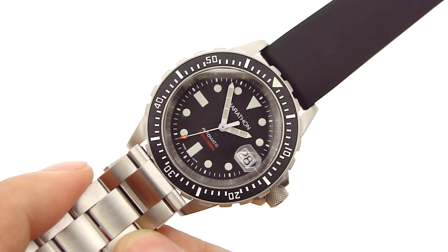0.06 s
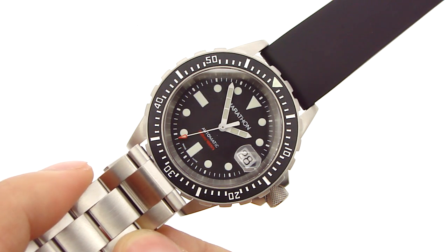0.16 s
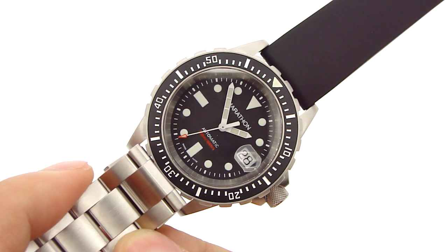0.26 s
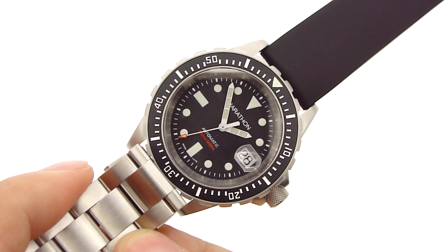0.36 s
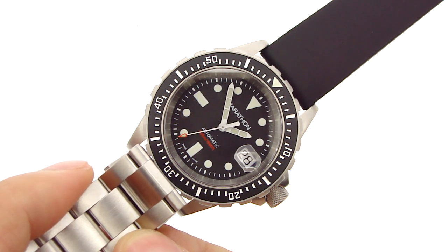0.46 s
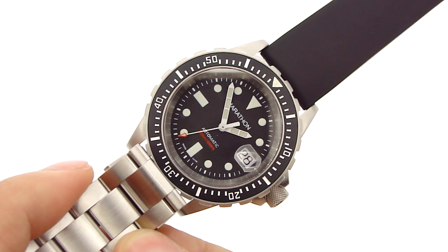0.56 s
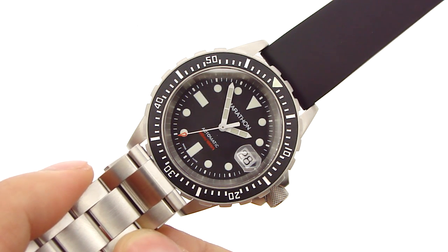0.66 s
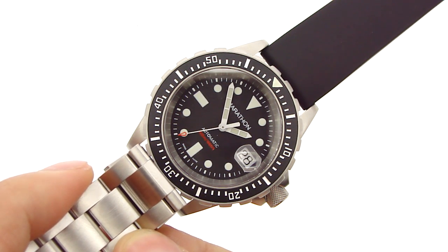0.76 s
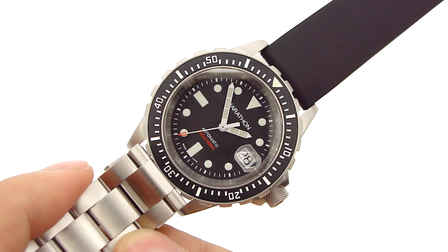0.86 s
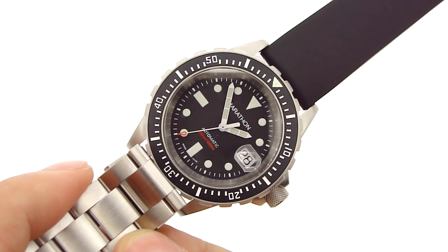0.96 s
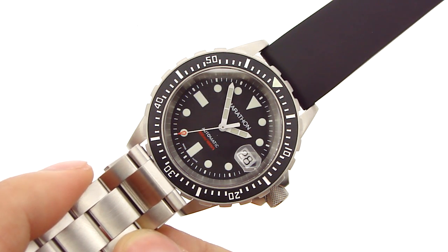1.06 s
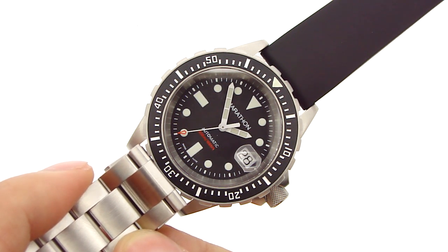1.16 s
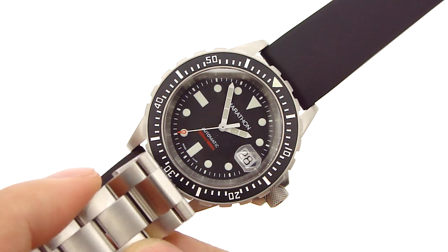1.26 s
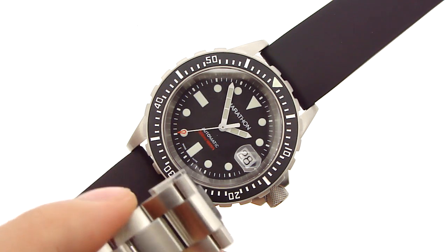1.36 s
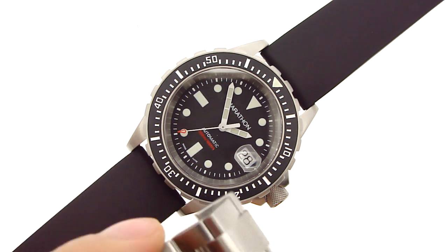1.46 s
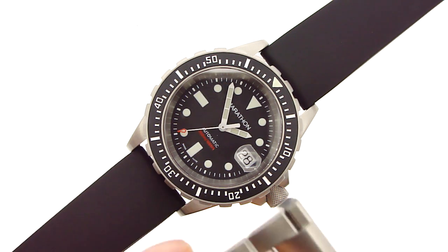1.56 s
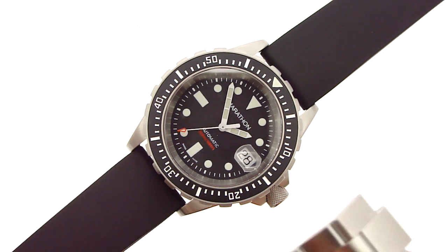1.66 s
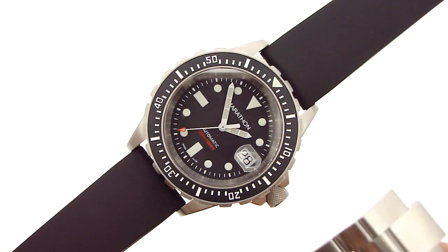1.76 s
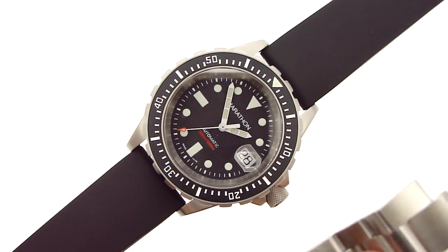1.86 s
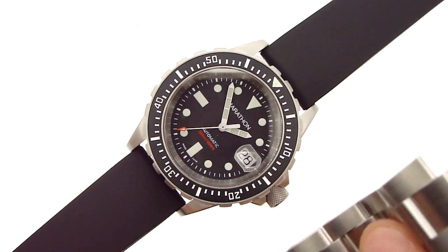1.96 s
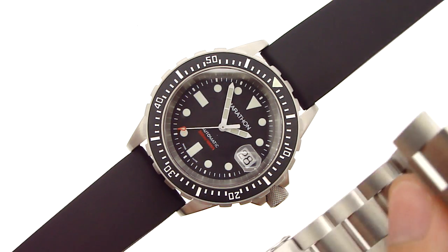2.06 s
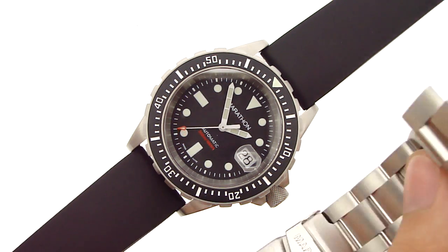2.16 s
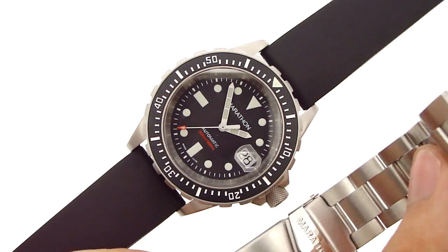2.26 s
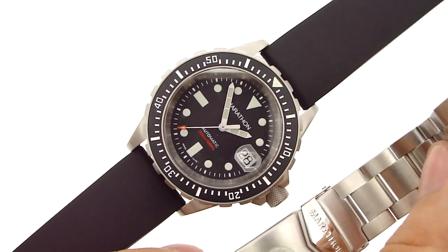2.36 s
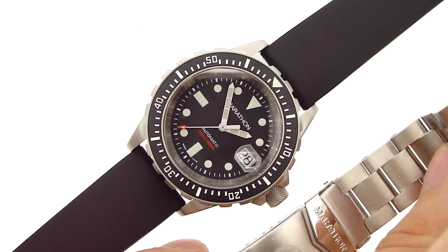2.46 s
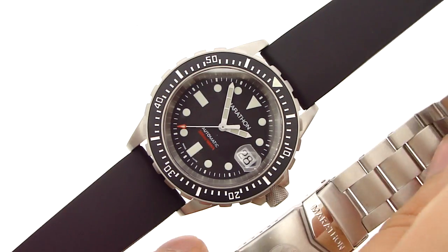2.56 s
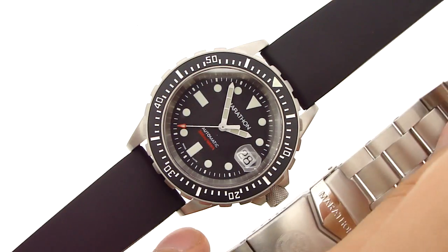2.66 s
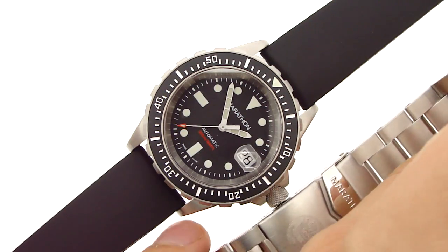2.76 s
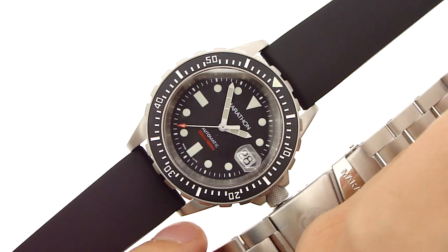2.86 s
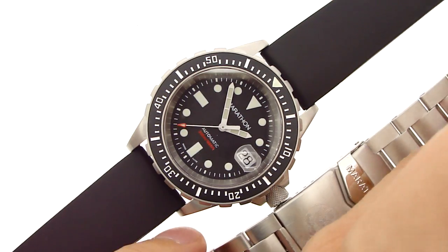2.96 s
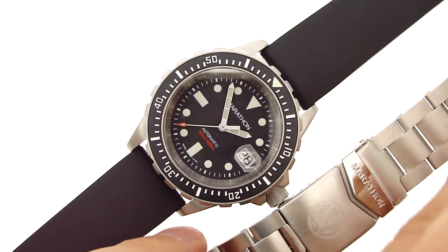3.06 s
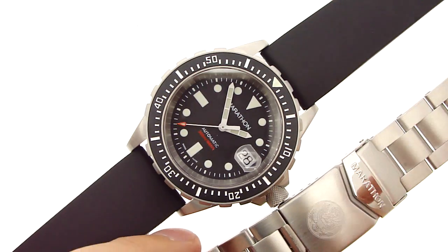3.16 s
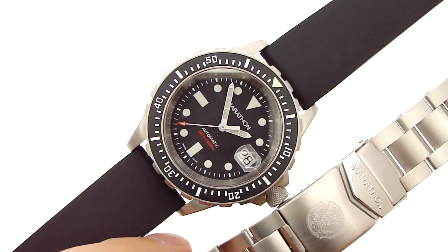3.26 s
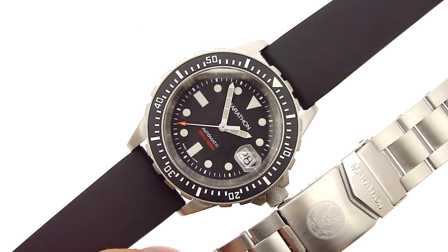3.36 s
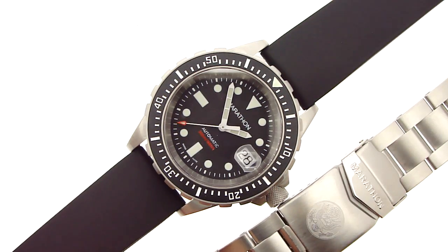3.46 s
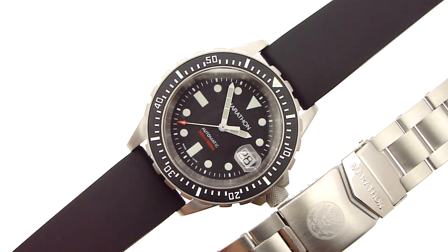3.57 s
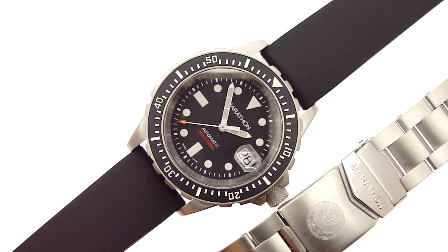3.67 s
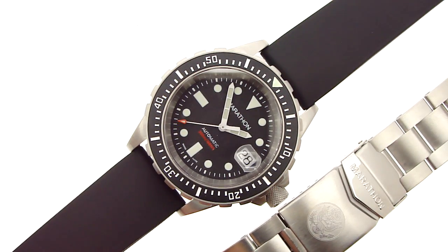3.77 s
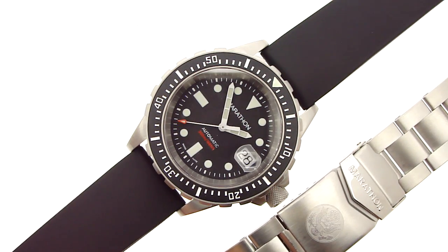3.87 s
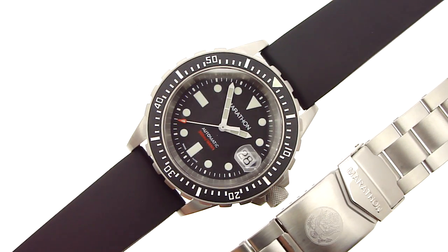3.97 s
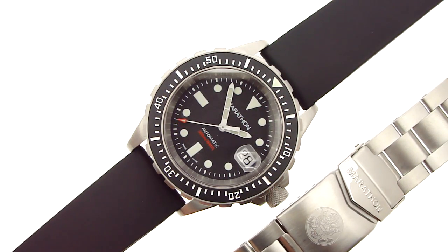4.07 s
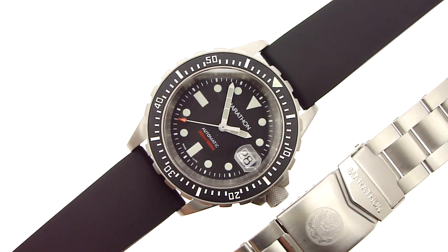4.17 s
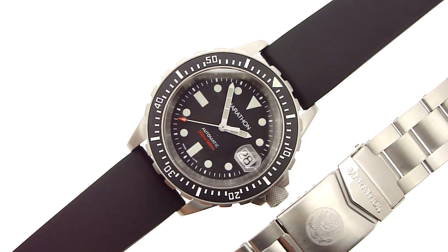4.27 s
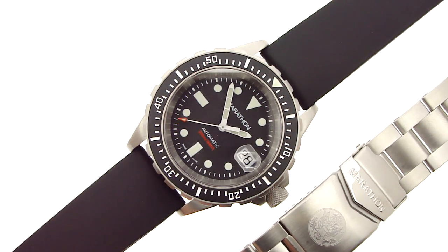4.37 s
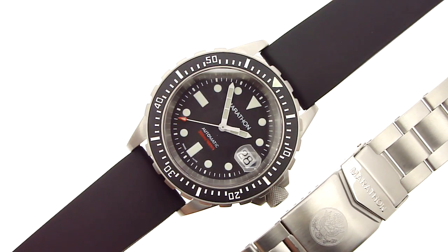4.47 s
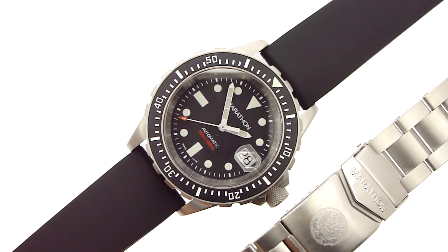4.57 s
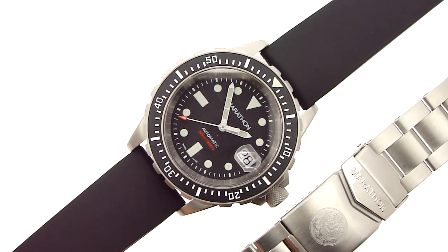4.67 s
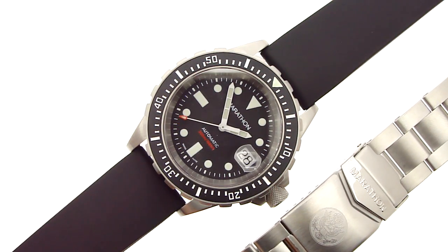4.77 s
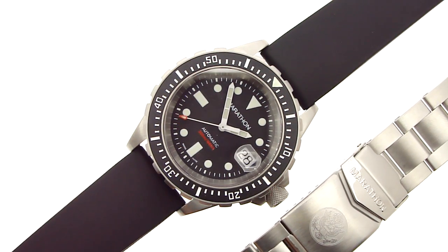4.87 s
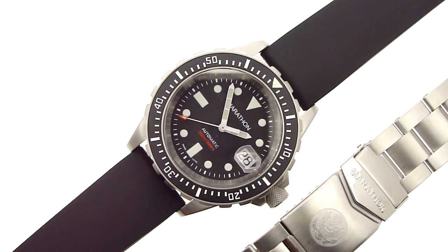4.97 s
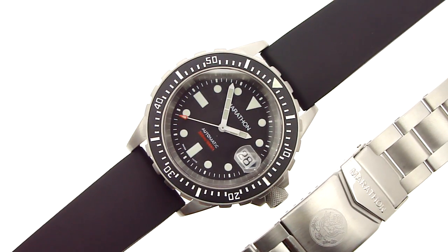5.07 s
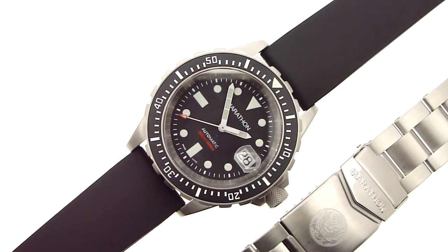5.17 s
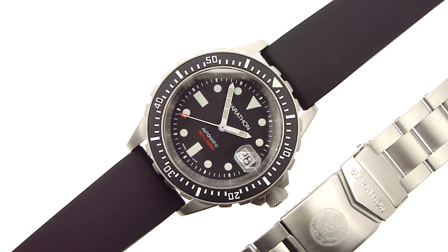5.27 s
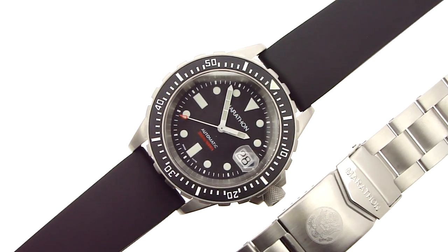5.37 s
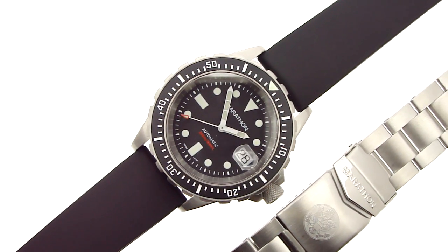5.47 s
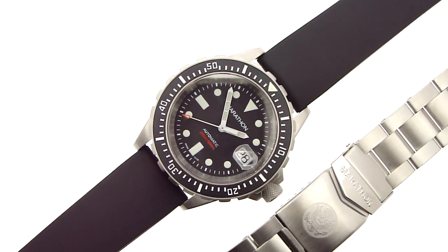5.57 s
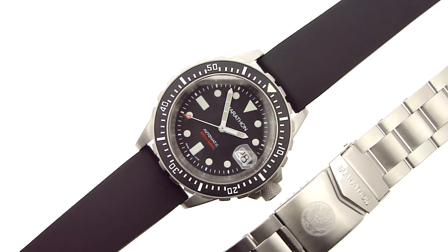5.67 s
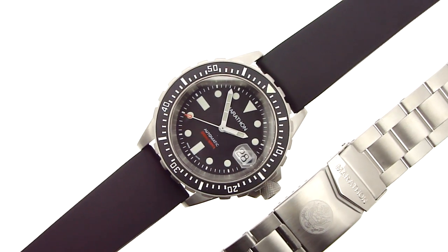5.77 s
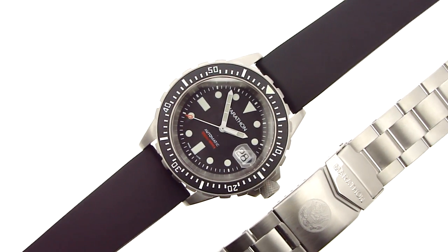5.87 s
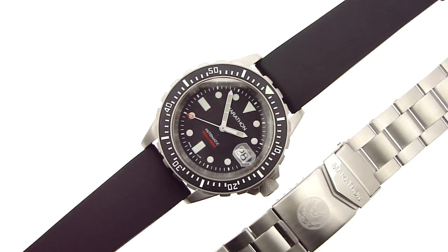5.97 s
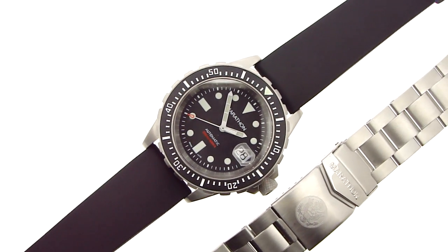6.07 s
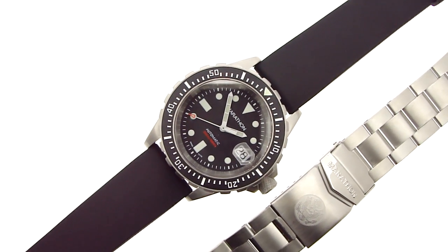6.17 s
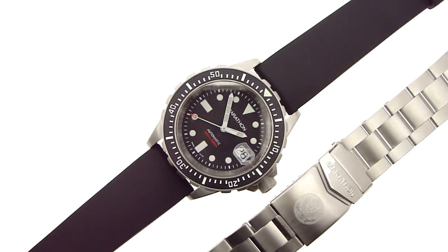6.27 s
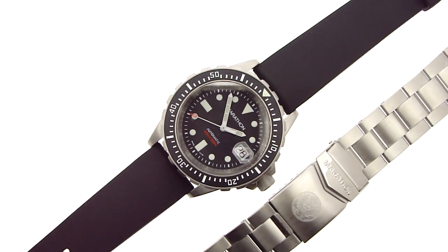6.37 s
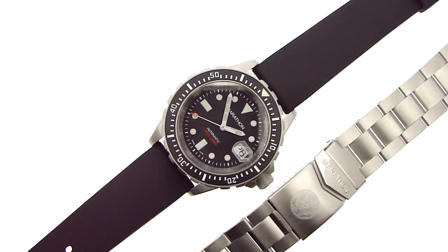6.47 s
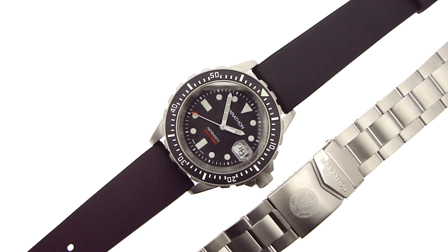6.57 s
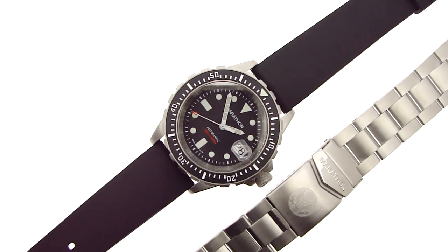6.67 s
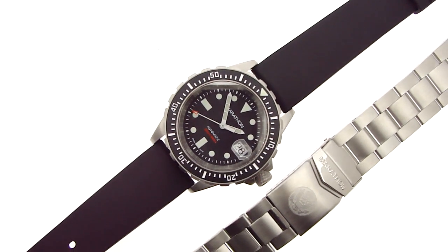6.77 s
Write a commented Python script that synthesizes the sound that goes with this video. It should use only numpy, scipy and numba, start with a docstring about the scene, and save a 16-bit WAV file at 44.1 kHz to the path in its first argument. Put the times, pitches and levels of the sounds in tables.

```python
"""A steel watch bracelet is lifted, laid on a table and nudged into place near a camera's microphone.
Links tick in the air, then links and clasp knock the table, ring and scrape.
The brightest clinks make the gain control duck the room's steady fan and mains hum.
Then a small plastic switch clicks twice under a fingertip and the camera's geared zoom motor whirrs."""
import sys
import numpy as np
from scipy import signal
from scipy.fft import rfft, irfft, next_fast_len
from scipy.io import wavfile
from scipy.ndimage import uniform_filter1d
from numba import njit

SR = 44100
rng = np.random.default_rng(int(sys.argv[2]) if len(sys.argv) > 2 else 0)


def unload_wav(signal):
    """Save mono or channel-first audio to the path in sys.argv[1] as 16-bit WAV at rate SR, clipped to [-1, 1]."""
    wavfile.write(
        sys.argv[1],
        SR,
        np.round(np.clip(np.atleast_2d(signal).T, -1, 1) * 32767).astype(np.int16),
    )


N = 300743
TIME = np.arange(N) / SR
ZOOM_START_S, ZOOM_SETTLE_S = 5.346, 0.086

# resonances shared by all links: freq_hz, width_hz, gain_db
BRACELET_MODES = [(2580, 160, 6), (3100, 200, 1), (3580, 110, 6), (4270, 200, 12), (4610, 200, 13.5),
                  (5350, 90, 12), (7090, 100, 17), (8450, 240, 13), (10420, 1200, 19)]
# resonances of the plastic switch: freq_hz, width_hz, gain_db
PLASTIC_MODES = [(2080, 940, 4), (3120, 900, 15), (4800, 740, -4), (8000, 1500, -3)]


def undb(db):
    return 10 ** (np.asarray(db) / 20)


def unit(x):
    return x / np.sqrt(np.mean(x ** 2))


def colour(x, points):
    """EQ through (freq_hz, gain_db) points."""
    hz, db = np.transpose(points)
    size = next_fast_len(len(x))
    bins_hz = np.maximum(np.fft.rfftfreq(size, 1 / SR), 1)
    gain = undb(np.interp(np.log(bins_hz), np.log(hz), db))
    return irfft(rfft(x, size) * gain, size)[:len(x)]


def resonate(x, modes, weights=1):
    """Input plus the ringing of each (freq_hz, width_hz, gain_db) mode."""
    out = x
    for (hz, width_hz, db), weight in zip(modes, weights * np.ones(len(modes))):
        out = out + weight * undb(db) * signal.lfilter(*signal.iirpeak(hz, hz / width_hz, fs=SR), x)
    return out


def band(x, edges_hz, order=3):
    return signal.sosfilt(signal.butter(order, edges_hz, "bandpass", fs=SR, output="sos"), x)


def hiss(hz, width_hz):
    """Noise band at unit rms."""
    return unit(band(rng.standard_normal(N), (hz - width_hz / 2, hz + width_hz / 2), order=2))


def at_level(x, db):
    """Scale a burst to the energy of 10 ms at db rms."""
    return x * undb(db) / np.sqrt(np.sum(x ** 2) / (SR / 100))


def add(out, start_s, x):
    i = int(start_s * SR)
    out[i:i + len(x)] += x[:N - i]


def drift(rate_hz):
    """Smooth random curve at unit rms."""
    step = int(SR / rate_hz)
    return unit(uniform_filter1d(np.repeat(rng.standard_normal(N // step + 1), step), step)[:N])


def swell(start_s, length_s, attack_s, release_s):
    """Linear rise, hold, exponential release."""
    age_s = TIME - start_s
    return np.clip(age_s / attack_s, 0, 1) * np.exp(-np.maximum(age_s - length_s, 0) / release_s)


def room(air_db=-43, waver_db=1.1, whine_db=-56, whine_drop_db=17):
    """Fan air, wavering mains and fan tones, and a thin whine that softens once the zoom runs."""
    # fan air spectrum: freq_hz, gain_db
    air_spectrum = [(18, -62), (30, -42), (53, -1.5), (91, -7.5), (119, -5.5), (205, -7), (232, -3),
                    (430, -9), (741, -12), (925, -10.5), (1340, -13.5), (1550, -15.5), (1800, -11),
                    (3250, -20.5), (11300, -38), (14200, -120), (22000, -120)]
    # fan air resonances: freq_hz, width_hz, gain_db
    air_modes = [(171.6, 35, 1.5), (292.4, 21, -2), (745, 11.8, 8), (1140, 84, -11), (1347, 100, 2.5),
                 (1760, 210, -15.5), (7020, 116, 1.5), (9650, 840, -3), (10150, 350, -2)]
    # mains and fan tones: pitch_hz, rms_db
    hum_tones = [(58.5, -73), (73.8, -75), (117, -61.5), (131, -56), (233.9, -52.5), (1754.2, -57.5)]
    air = colour(resonate(rng.standard_normal(N), air_modes), air_spectrum)
    low_cut = signal.butter(4, 125, "highpass", fs=SR, output="sos")
    air = unit(signal.sosfilt(low_cut, air) + 0.16 * air)
    hum = np.zeros(N)
    for hz, db in hum_tones:
        peak = np.sqrt(2) * undb(db + waver_db * drift(3.5))
        hum += peak * np.sin(2 * np.pi * (hz * TIME + rng.random()) + 0.55 * drift(4.14))
    zooming = np.clip((TIME - ZOOM_START_S) / ZOOM_SETTLE_S, 0, 1)
    whine = hiss(2095, width_hz=112) * undb(whine_db - whine_drop_db * zooming)
    return air * undb(air_db + 0.2 * drift(5)) + hum + whine


def clink(contact_s, modes, tail_db, crack=4, shared=0.25, early_db=-12, early_s=0.005,
          chatter_db=-24, chatter_s=0.011, room_db=-36, room_s=0.072, size=8192):
    """Steel contact: a crack amid tiny impacts, then reflections, link chatter and faint room decay."""
    t = np.arange(size) / SR
    rattle = unit(undb(2.5 * np.repeat(rng.standard_normal(size // 32), 32)))
    early = undb(early_db) * np.exp(-t / early_s)
    chatter = rattle * undb(chatter_db) * np.exp(-t / chatter_s)
    tail = undb(tail_db) * (early + chatter + undb(room_db) * np.exp(-t / room_s))
    progress = t / contact_s
    pulse = progress ** 2 * np.exp(2 - 2 * progress)
    force = rng.standard_normal(size) * (pulse + tail * (1 - np.exp(-progress)))
    force[np.argmax(progress >= 1)] += crack  # main impact at the pulse peak
    shared_mix = shared * rng.standard_normal(len(BRACELET_MODES))
    return resonate(resonate(force, modes), BRACELET_MODES, shared_mix)


def loose_links(contact_s=0.0008, width_hz=550, ring_db=14):
    """Airborne links tick, short and dry, each at its own pitch, with no knock."""
    # link-on-link ticks: start_s, level_db, ring_hz
    ticks = [(1.389, -57, 9000), (1.504, -46.5, 9300), (1.5095, -51, 10000), (1.602, -50, 6870),
             (1.6225, -58, 7000), (1.639, -48, 6300), (1.717, -51.5, 5030), (1.744, -57, 6800),
             (1.8943, -38.5, 5350), (1.9068, -38.5, 5450), (1.9334, -49.5, 6400), (2.1492, -47.5, 5700),
             (2.181, -53, 6300)]
    out = np.zeros(N)
    for start_s, db, ring_hz in ticks:
        tick = clink(contact_s, [(ring_hz, width_hz, ring_db)], tail_db=-4, shared=0.091)
        add(out, start_s, at_level(band(tick, (2900, 11500), order=2), db))
    return out


def scrapes_and_ring_out(grain_db=2.5, rumble_db=-26, body_width_hz=260, body_db=3, flutter_db=1.4):
    """Grains ring table and links: scrapes, and the bright, gritty ring-out after the clasp's clinks."""
    # table resonances: freq_hz, width_hz, gain_db
    table_modes = [(545, 52, 5), (1017, 69, 10.5), (3090, 150, 0), (4460, 430, 2)]
    # grit spectrum: freq_hz, gain_db
    grit_spectrum = [(150, -18), (560, 5), (1100, -3), (2000, 1.5), (4500, -8.5), (7000, -8), (11000, -22)]
    # scrapes and ring-out: start_s, length_s, level_db, treble_db, body_hz
    bursts = [(2.28, 0.4, -50, 2, 570), (2.64, 0.051, -40, -6, 1020), (2.715, 0.12, -41, -3, 560),
              (2.934, 0.042, -44.5, 12, 1060), (3.038, 0.096, -36, -13, 1400), (3.269, 0.12, -42, 10, 540)]
    grains = rng.standard_normal(N)
    grains *= undb(grain_db * np.repeat(rng.standard_normal(N // 64 + 1), 64)[:N])
    ringing = colour(resonate(resonate(grains, table_modes), BRACELET_MODES, 0.32), grit_spectrum)
    rumble = undb(rumble_db) * unit(band(rng.standard_normal(N), (18, 70), order=2))
    out = np.zeros(N)
    for start_s, length_s, db, treble_db, body_hz in bursts:
        grit = unit(resonate(ringing, [(body_hz, body_width_hz, body_db)]))
        treble_trim = (undb(treble_db) - 1) * band(grit, (5500, 12000), order=1)
        envelope = undb(db) * swell(start_s, length_s, attack_s=0.026, release_s=0.054)
        out += (grit + rumble + treble_trim) * envelope
    return out * undb(flutter_db * drift(45))


def balance(x, levels_db):
    """Set a clink's four band levels."""
    # knock, ring, ping and tick bands: low_hz, high_hz
    bands = [(280, 2300), (2300, 5000), (5000, 8000), (8000, 11500)]
    return sum(at_level(band(x, edges_hz, order=5), db) for edges_hz, db in zip(bands, levels_db))


def neighbour_modes(count=6, low_hz=2900, high_hz=9000, width_hz=130, gain_db=6):
    """Adjacent links ring along, at new pitches on each contact."""
    spread = (np.arange(count) + rng.random(count)) / count
    return [(hz, width_hz, gain_db) for hz in low_hz * (high_hz / low_hz) ** spread]


def landing_links():
    """Each link knocks its spot of table and rings at two pitches; held links stop, free ones rattle."""
    # landings: start_s, knock_db, ring_db, ping_db, tick_db, tail_db, contact_s,
    # knock_hz, ring_hz, ping_hz
    landings = [(2.288, -35, -24.5, -27, -33, 5, .0011, 420, 2780, 6600),
                (2.2967, -32.5, -25.5, -32, -30, 0, .0007, 500, 4080, 5560),
                (2.3097, -49, -43, -46, -50, -3, .0007, 520, 3000, 6800),
                (2.3394, -42, -32, -39, -47, -5, .0006, 570, 4030, 7110),
                (2.3432, -40, -41, -48, -52, 0, .0012, 570, 2700, 7110),
                (2.3538, -50, -46, -53, -53, -3, .001, 570, 2900, 7000),
                (2.3753, -34, -31.5, -33, -43, 4, .0008, 550, 3730, 5400),
                (2.4728, -31.5, -39, -36.5, -52, 3, .0009, 485, 3630, 7100),
                (2.4785, -44, -44, -48, -60, 3, .0016, 700, 3510, 5800),
                (2.503, -51, -37.5, -46, -58, 2, .0016, 600, 4570, 7050),
                (2.5074, -39.5, -37.5, -31, -35, 7, .0009, 600, 2560, 5600),
                (2.52, -39.5, -40, -41, -59, -2, .0023, 450, 4720, 7000),
                (2.6102, -40, -42.5, -46.5, -56, 11, .0009, 600, 4370, 7100),
                (2.6615, -33.5, -25, -30, -39, -2, .0008, 2150, 3380, 5170),
                (2.6695, -34, -46, -49, -58, 0, .0022, 1020, 2600, 5010),
                (2.783, -39.5, -43, -48, -56, 0, .0035, 560, 4510, 6770),
                (2.8220, -35, -20.5, -32.5, -30, -8, .0007, 560, 4530, 6800),
                (2.901, -42, -48, -44.5, -53, 7, .0017, 560, 4330, 7100),
                (3.263, -46, -39, -42, -56, 0, .001, 560, 4100, 5500),
                (3.2858, -50, -22.5, -32, -31, -5, .0005, 560, 4200, 5200),
                (3.288, -35, -27.5, -27, -23.5, 2.5, .0006, 540, 3300, 6850),
                (3.3115, -34, -20.5, -37, -24.5, -4, .0006, 536, 4350, 5210),
                (3.3431, -39, -26, -26.5, -25, 4, .0009, 560, 4400, 6860),
                (3.3536, -48, -30, -32, -38, 13, .0011, 560, 3620, 6900)]
    # table resonances under a link: freq_hz, width_hz, gain_db
    knock_modes = [(374, 62, 2), (528, 47, 9), (1030, 95, 3.5), (1990, 370, 0.5)]
    out = np.zeros(N)
    for start_s, *levels_db, tail_db, contact_s, knock_hz, ring_hz, ping_hz in landings:
        own_modes = [(knock_hz, 220, 6), (ring_hz, 950, 9), (ping_hz, 650, 5)]
        hit = clink(contact_s, [*knock_modes, *own_modes, *neighbour_modes()], tail_db)
        add(out, start_s, balance(hit, levels_db))
    return out


def clasp(width_hz=650, ring_db=6):
    """The thin clasp drops and rocks, ringing bright over a hollow knock."""
    # clasp contacts: start_s, knock_db, ring_db, ping_db, tick_db, tail_db, contact_s, ring_hz
    contacts = [(2.9524, -32, -32.5, -26, -21, 0, 0.00077, 8700),
                (2.9661, -35, -37.5, -28, -29, 8, 0.0025, 6200),
                (3.0504, -33, -42, -28, -23.5, -4, .0011, 8600),
                (3.0654, -38, -40, -30, -31, 3, .001, 8750),
                (3.0744, -28, -37, -32, -19.5, -7, 0.00051, 9900),
                (3.1109, -38, -31.5, -25, -21.5, 5, 0.00076, 10000),
                (3.123, -34, -35, -29, -33, 3, .0012, 7500)]
    # table resonances under the clasp: freq_hz, width_hz, gain_db
    knock_modes = [(680, 120, 1.5), (1060, 190, 15)]
    # steel plate resonances: freq_hz, width_hz, gain_db
    plate_modes = [(6250, 220, -5), (8050, 200, 2), (8800, 260, 5), (10060, 450, 1), (10700, 250, -6)]
    out = np.zeros(N)
    for start_s, *levels_db, tail_db, contact_s, ring_hz in contacts:
        modes = [*knock_modes, *plate_modes, (ring_hz, width_hz, ring_db)]
        hit = clink(contact_s, modes, tail_db, crack=3, chatter_db=-20, room_db=-32)
        add(out, start_s, balance(hit, levels_db))
    return out


def switch(snap_s=0.0021, housing_s=0.0012, ring_rise_s=0.00034, housing_rise_s=0.00077, size=4096):
    """A plastic switch snaps, rings for a few milliseconds and knocks the housing."""
    # switch and zoom drive clicks: start_s, ring_db, ring_hz, decay_s, snap_db, housing_db, housing_hz
    clicks = [(4.9269, -39, 4820, 0.00072, -33, -50, 1210), (4.928, -27, 2490, 0.002, -40, -41, 1510),
              (4.9311, -36, 3420, .0009, -39, -37, 1240), (4.9328, -31, 2510, 0.0022, -46, -44, 1290),
              (5.2181, -30, 2800, 0.0015, -46, -38.5, 623),
              (5.2203, -35.5, 2130, 0.00081, -49, -40.5, 1400), (5.224, -48, 2830, .0018, -53, -55, 700),
              (5.2950, -45, 3750, 0.0025, -48, -52, 1130), (5.3468, -43, 1660, .002, -52, -43, 640)]
    out, t = np.zeros(N), np.arange(size) / SR
    housing_envelope = np.exp(-t / housing_s) * (1 - np.exp(-t / housing_rise_s))
    for start_s, ring_db, ring_hz, decay_s, snap_db, housing_db, housing_hz in clicks:
        ring = np.sin(2 * np.pi * ring_hz * t) * np.exp(-t / decay_s) * (1 - np.exp(-t / ring_rise_s))
        knock = np.sin(2 * np.pi * housing_hz * t) * housing_envelope
        burst = rng.standard_normal(size) * np.exp(-t / snap_s)
        snap = band(resonate(burst, PLASTIC_MODES), (1200, 11000), order=1)
        add(out, start_s, at_level(ring, ring_db) + at_level(knock, housing_db) + at_level(snap, snap_db))
    return out


def fingertip(rub_db=-54, catch_s=0.003):
    """Skin catches and rubs softly on the switch between clicks."""
    # skin catching on plastic: peak_s, level_db
    touches = [(5.034, -42), (5.073, -51)]
    friction = unit(band(resonate(rng.standard_normal(N), PLASTIC_MODES), (2300, 9000), order=1))
    catches = sum(undb(db) * np.exp(-np.abs(TIME - peak_s) / catch_s) for peak_s, db in touches)
    rub = undb(rub_db) * swell(5.02, length_s=0.22, attack_s=0.015, release_s=0.026)
    return friction * (catches + rub)


def zoom(run_db=-58.5, surge_db=-40, jolt_db=-40, rise_s=0.057, speed_up_s=0.2,
         gear_hz=25.07, uneven_db=4):
    """The motor jolts, surges up to speed and hisses; the gear ticks and swishes unevenly each turn."""
    # housing resonances: freq_hz, width_hz, gain_db
    housing_modes = [(360, 22, 19), (600, 260, 10), (1560, 110, 18), (2480, 170, 15.5), (2900, 150, 14.5),
                     (4180, 360, 7)]
    # steady drive hiss: freq_hz, width_hz, level_db
    drive_bands = [(3020, 220, -63), (4170, 490, -60.5), (4760, 170, -65.5), (5520, 200, -77),
                   (9350, 400, -72)]
    # once-per-turn gear rubs: phase_turns, spread_turns, freq_hz, width_hz, level_db
    gear_rubs = [(0.48, 0.078, 2570, 420, -54.5), (.12, 0.17, 5930, 800, -59)]
    age_s = TIME - ZOOM_START_S
    turns = np.cumsum(gear_hz * (1 + 0.005 * drift(6.1))) / SR
    turns -= np.interp(ZOOM_START_S, TIME, turns)
    housing = resonate(rng.standard_normal(N), housing_modes)
    surge = undb(surge_db) * np.exp(-np.maximum(age_s, 0) / ZOOM_SETTLE_S)
    effort = np.clip(1 + age_s / rise_s, 0, 1) * (undb(run_db) + surge)
    rasp = unit(band(housing, (250, 5000), order=1)) * effort
    jolt = undb(jolt_db) * unit(band(rng.standard_normal(N), (420, 780)))
    jolt *= swell(ZOOM_START_S, length_s=0.032, attack_s=0.0027, release_s=0.029)
    gears = sum(undb(db) * hiss(hz, width_hz) for hz, width_hz, db in drive_bands)
    for phase_turns, spread_turns, hz, width_hz, db in gear_rubs:
        offset_turns = (turns - phase_turns + 0.5) % 1 - 0.5
        contact = np.exp(-0.5 * (offset_turns / spread_turns) ** 2)
        gears += hiss(hz, width_hz) * contact * undb(db + uneven_db * drift(gear_hz))
    return rasp + jolt + gears * np.clip(age_s / speed_up_s, 0, 1)


def scene():
    """Bracelet, camera and room at one microphone."""
    bracelet = loose_links() + landing_links() + clasp() + scrapes_and_ring_out()
    camera = switch() + fingertip() + zoom()
    return (bracelet + camera + room())[None]


@njit
def follow(x, attack, release):
    """Level detector; attack and release are per-sample rates."""
    out, level = np.empty(len(x)), 0.
    for i in range(len(x)):
        level += max(x[i] - level, 0.) * attack - level * release
        out[i] = level
    return out


def record(dry, threshold_db=-34, attack_s=0.015, release_s=0.14, lag_s=0.0027, cutoff_hz=11050):
    """Treble-keyed gain control ducks just after the brightest clinks; a steep low-pass follows."""
    treble = np.abs(band(dry[0], (8500, 14000), order=2))
    level = follow(treble, 1 / (attack_s * SR), 1 / (release_s * SR))
    late_level = np.interp(TIME - lag_s, TIME, level)
    gain = 1 / np.maximum(late_level / undb(threshold_db), 1)
    return signal.sosfilt(signal.ellip(12, 0.2, 70, cutoff_hz, fs=SR, output="sos"), dry * gain)


dry = scene()
out = record(dry)
unload_wav(out)
```